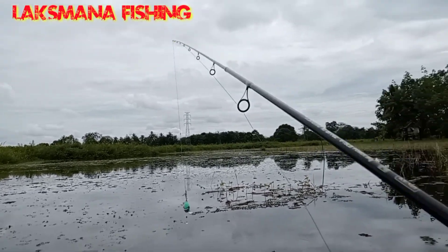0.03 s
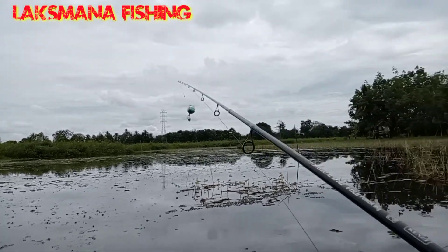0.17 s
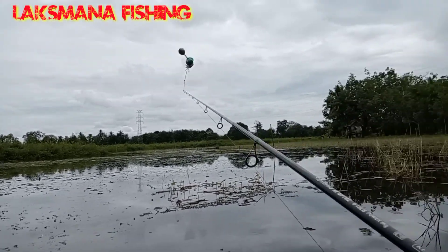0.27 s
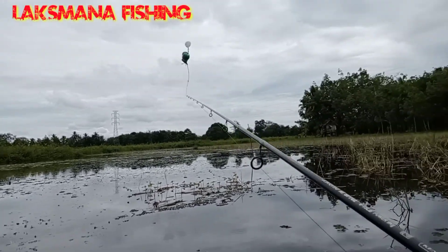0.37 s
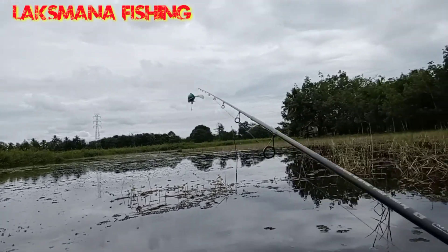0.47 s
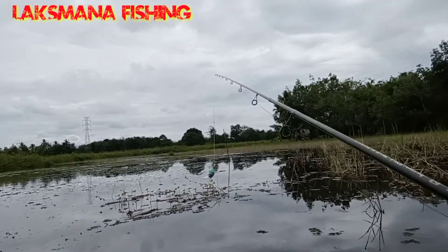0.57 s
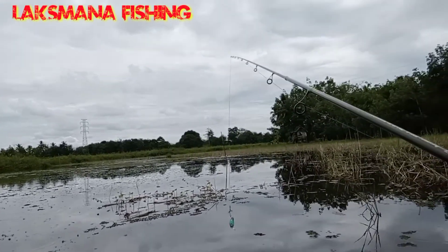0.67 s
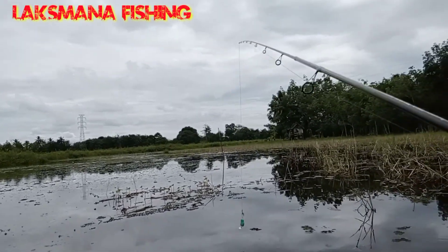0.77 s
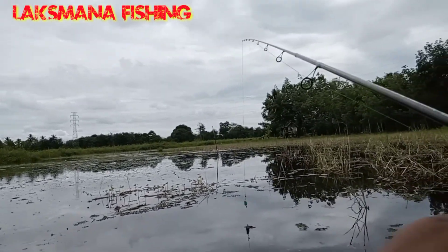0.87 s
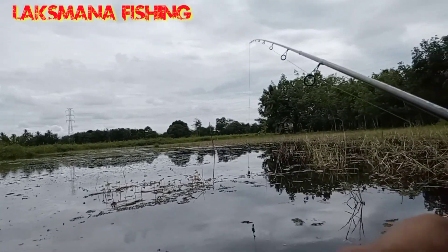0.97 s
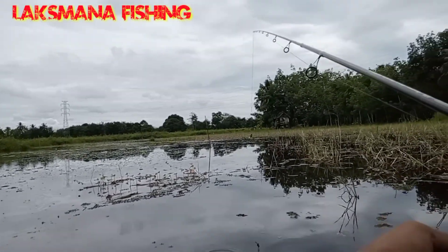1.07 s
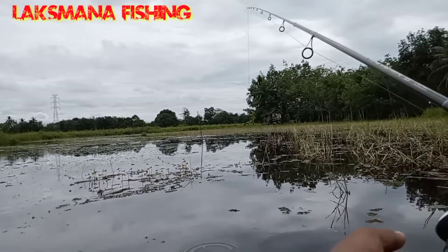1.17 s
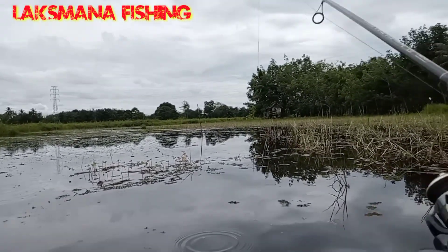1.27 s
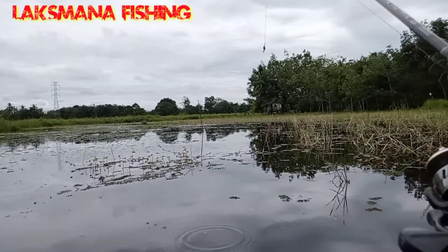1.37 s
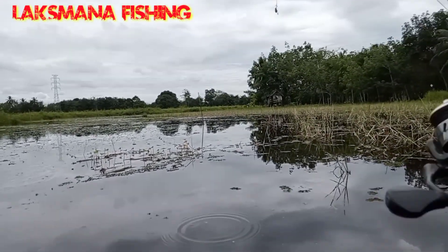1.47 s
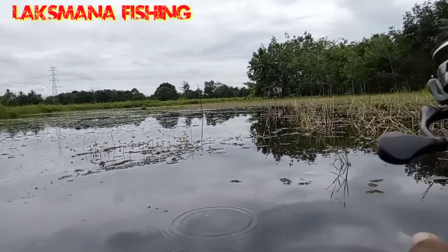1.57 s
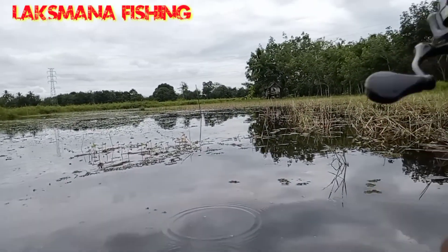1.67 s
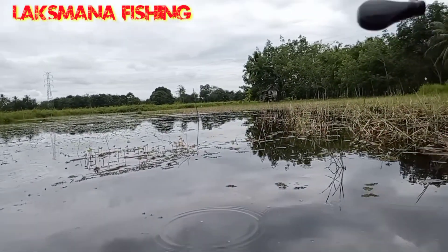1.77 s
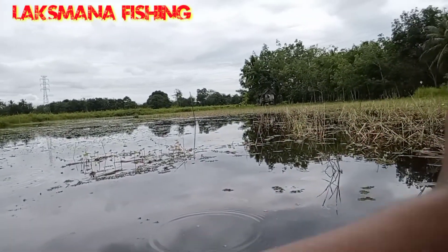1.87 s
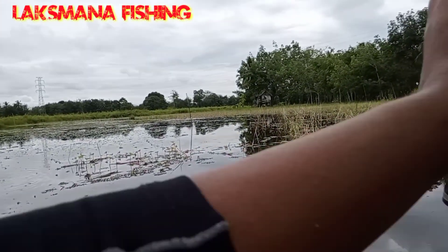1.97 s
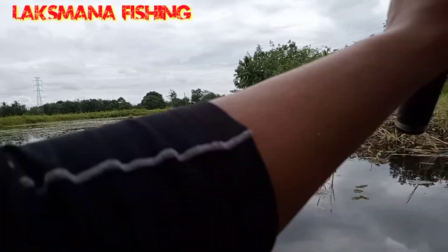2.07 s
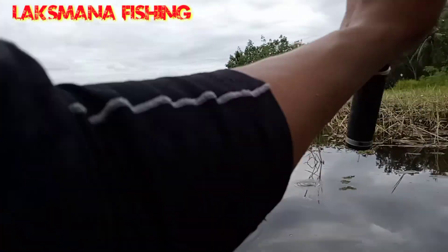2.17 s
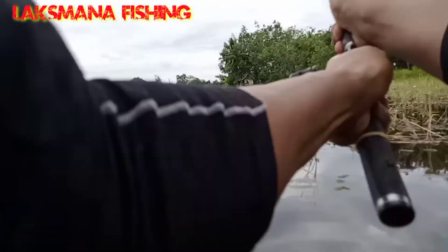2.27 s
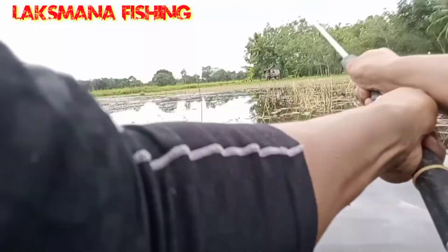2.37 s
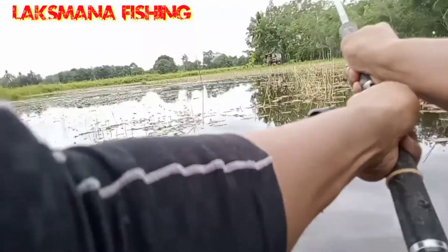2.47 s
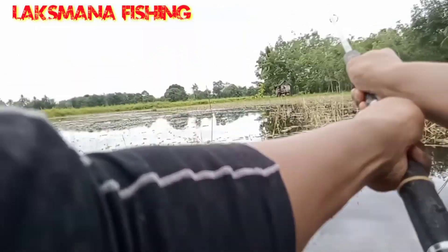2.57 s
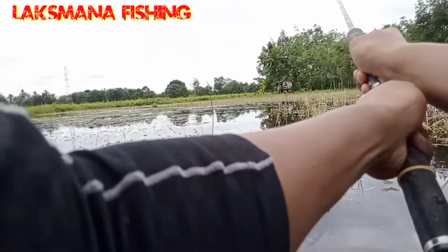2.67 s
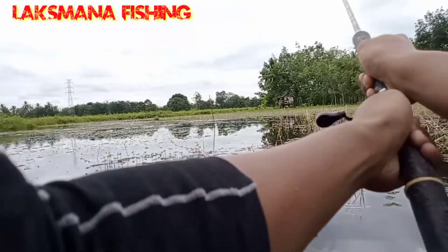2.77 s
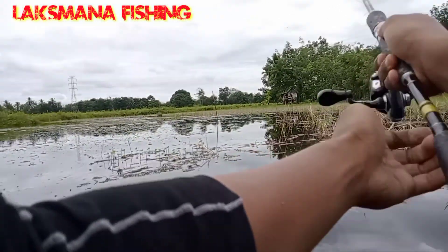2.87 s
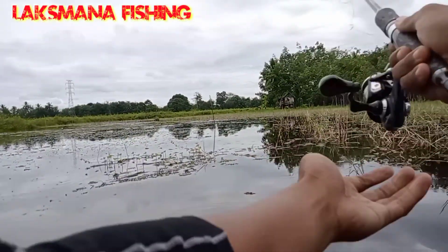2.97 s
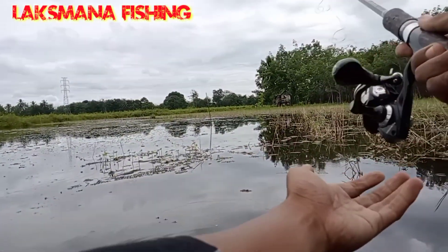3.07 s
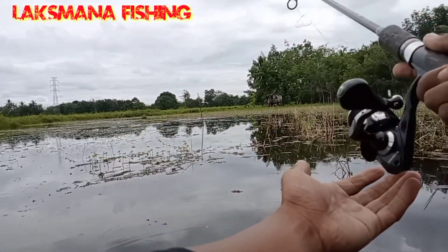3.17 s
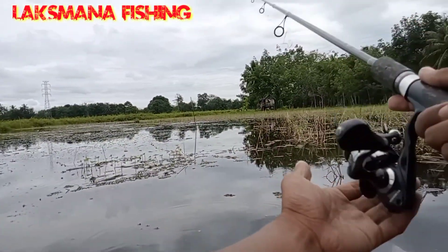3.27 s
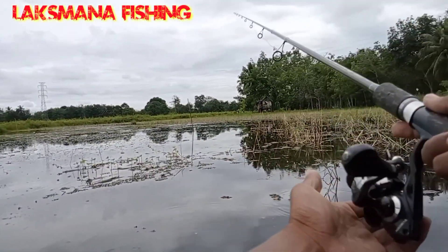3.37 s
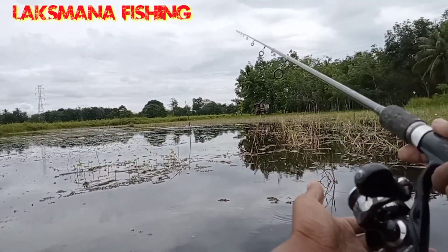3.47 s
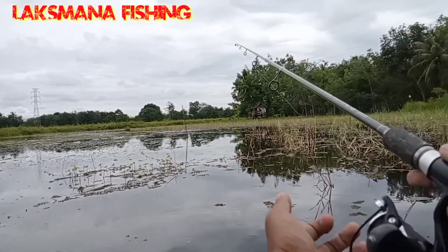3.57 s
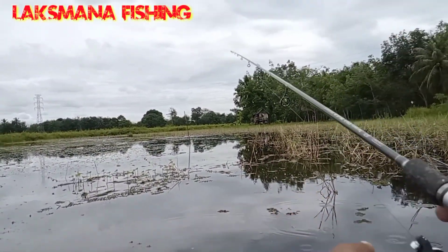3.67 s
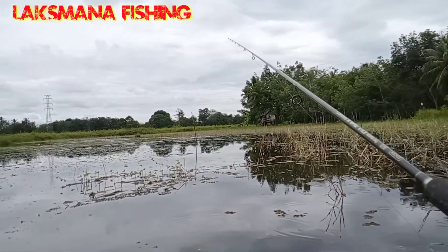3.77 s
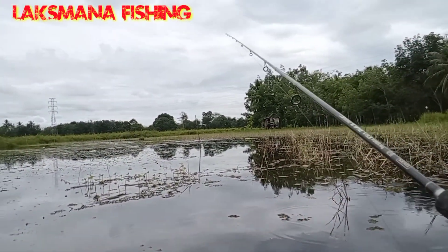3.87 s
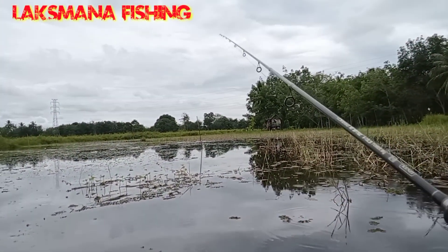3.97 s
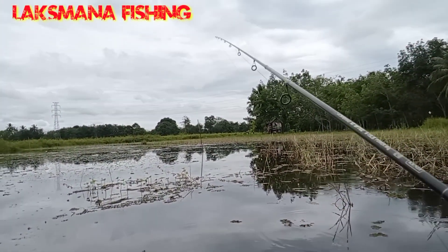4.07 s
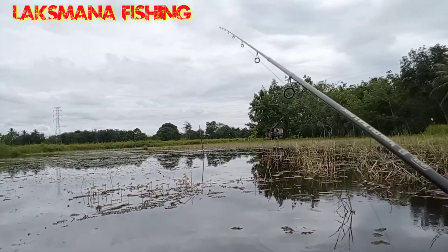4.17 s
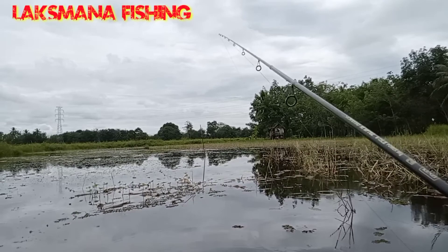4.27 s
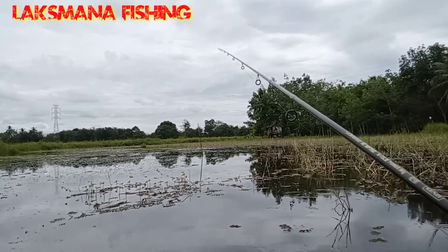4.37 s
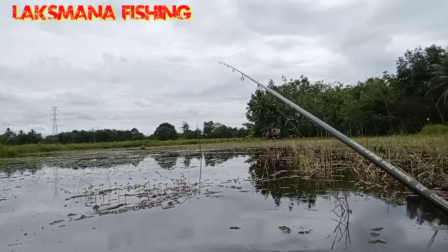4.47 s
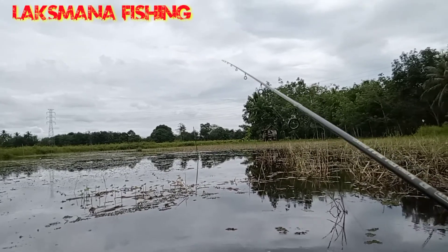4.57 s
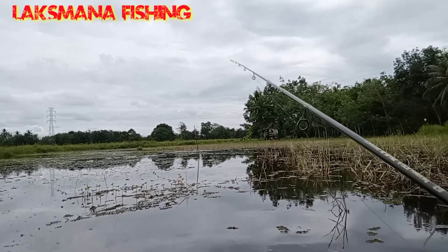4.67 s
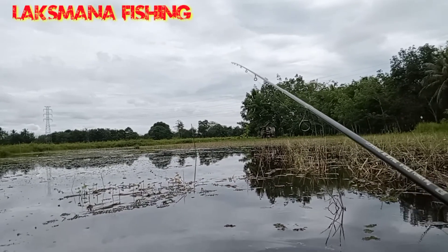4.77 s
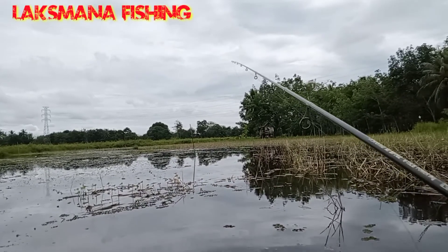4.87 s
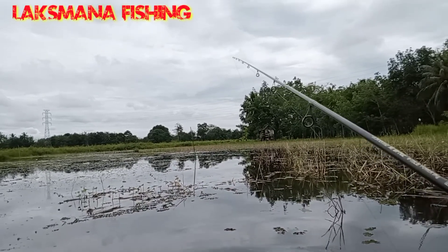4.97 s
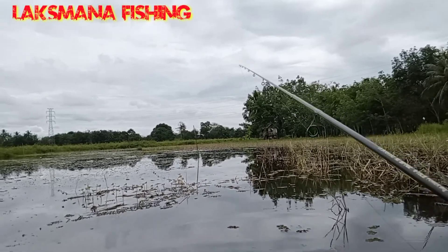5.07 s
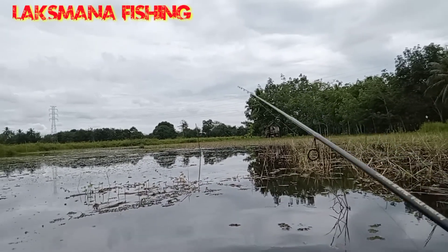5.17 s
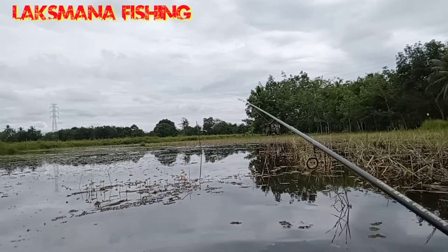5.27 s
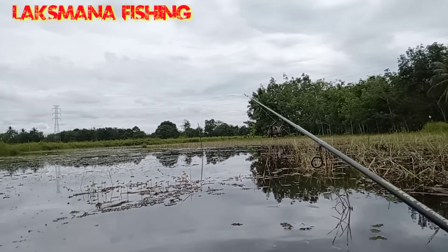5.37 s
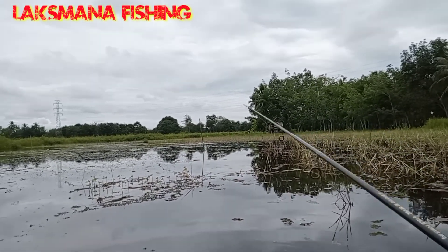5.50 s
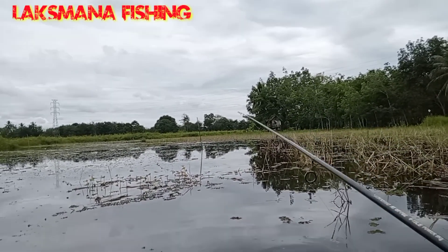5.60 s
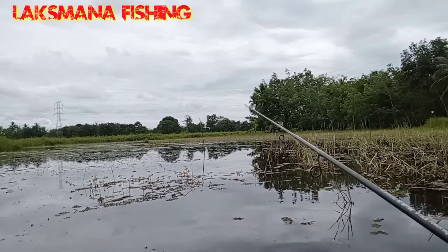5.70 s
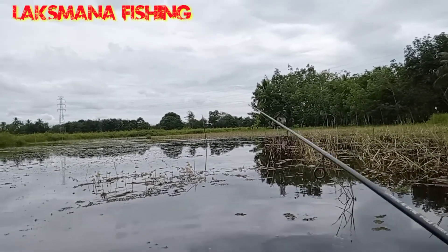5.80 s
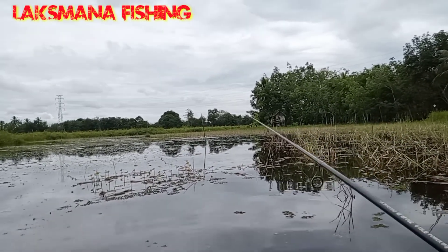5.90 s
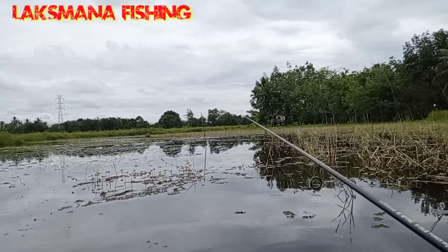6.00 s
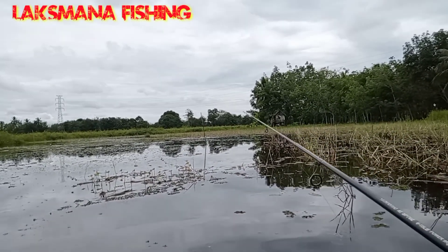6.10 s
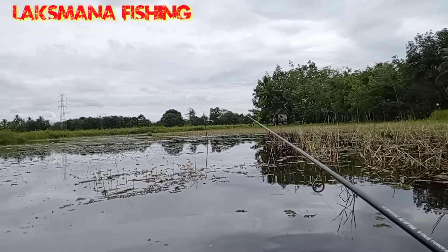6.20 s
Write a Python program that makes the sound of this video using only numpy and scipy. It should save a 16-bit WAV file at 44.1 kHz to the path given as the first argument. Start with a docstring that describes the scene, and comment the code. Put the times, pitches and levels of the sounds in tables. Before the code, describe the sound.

A fishing reel clicks, a rod swishes and line hisses out, then the reel snaps shut and whirrs over faint insects.

```python
"""Insects hiss over a swampy lake while fishing tackle clicks, a sleeve rustles and a small bird chips.
The bail (the reel's wire arm) clicks open, the rod swishes through the air, and line pours off the spool
in a hiss that sinks as the lure slows. The bail snaps shut, the reel shudders, and its gears whine and
whirr as the line is wound in."""
import sys
import numpy as np
from scipy import signal
from scipy.fft import rfft, irfft
from scipy.io import wavfile

SR = 44100
rng = np.random.default_rng(int(sys.argv[2]) if len(sys.argv) > 2 else 0)


def inscribe(sig):
    """Save sig as 16-bit PCM at rate SR to the path in sys.argv[1].

    A 1-D sig is mono; a 2-D sig holds one channel per row.
    Samples are clipped to [-1, 1] before scaling.
    """
    pcm = np.round(np.clip(np.atleast_2d(sig).T, -1, 1) * 32767)
    wavfile.write(sys.argv[1], SR, pcm.astype(np.int16))


N = 275139
T = np.arange(N) / SR

# tone shared by the clicks and whirr, strong middle tones and little above them: pitch_hz, level_db
MID_TONE = [(1300, -8), (2200, -4.5), (4300, -5), (5300, -18.5)]
# the bright edge of a click: pitch_hz, level_db
EDGE_TONE = [(2000, -15.5), (4500, -6.5), (6000, -9), (8000, -6.5), (9700, 2), (12000, -16), (15500, -21)]


def amp(db):
    """Turns decibels into a gain."""
    return 10 ** (np.asarray(db) / 20)


def unit(x):
    """Scales a sound to an average (rms) level of 1."""
    return x / np.sqrt(np.mean(x ** 2) + 1e-20)


def unit_hit(x):
    """Gives a short sound the energy of ten milliseconds at level 1."""
    return x / np.sqrt(np.sum(x ** 2) / (SR * .01))


def add(mix, start_s, sound):
    """Lays a sound into the mix."""
    part = mix[round(start_s * SR):][:len(sound)]
    part += sound[:len(part)]


def colour(x, spectrum, size=4096):
    """Shapes a sound's tone with a filter drawn through rows of pitch_hz, level_db."""
    hz, db = np.transpose(spectrum)
    bins_hz = abs(np.fft.fftfreq(size, 1 / SR))
    log_gain = np.log(amp(np.interp(np.log(bins_hz + 1), np.log(hz + 1), db)))
    taps = np.fft.ifft(np.exp(np.conj(signal.hilbert(log_gain)))).real  # rings only after a hit
    return signal.oaconvolve(x, taps[:size // 2])[:len(x)]


def resonate(x, hz, width_hz):
    """Lets through the sound near one pitch, which may glide."""
    turn = np.exp(2j * np.pi * np.cumsum(hz * np.ones(len(x))) / SR)
    feedback = np.exp(-np.pi * width_hz / SR)
    return 2 * (turn * signal.lfilter([1 - feedback], [1, -feedback], x / turn)).real


def band(x, hz, width_hz):
    """The same resonance twice: a band with steep sides, at level 1."""
    return unit(resonate(resonate(x, hz, width_hz), hz, width_hz))


def wander(rate):
    """A smooth random curve that changes up to about rate times a second."""
    smoothing = np.exp(-(np.fft.rfftfreq(N, 1 / SR) / rate) ** 2)
    return unit(irfft(rfft(rng.standard_normal(N)) * smoothing, N))


def grainy(rate, depth_db):
    """Noise that comes in random clumps."""
    return unit(rng.standard_normal(N) * amp(depth_db * wander(rate)))


def texture(spectrum, rate, depth_db):
    """Clumpy noise with a given tone, at level 1."""
    return unit(colour(grainy(rate, depth_db), spectrum))


def burst(decay_s, size=4096):
    """Two things touch: chatter that dies quickly."""
    return rng.choice([-1., 1.], size) * np.exp(-np.arange(size) / SR / decay_s)


def scattered(x, db, decay_s):
    """Adds close echoes, which ripple the tone."""
    tail = burst(decay_s)
    taps = rng.standard_normal(len(tail)) * tail
    echoes = signal.oaconvolve(x, taps / np.linalg.norm(taps))[:N]
    return (x + amp(db) * echoes) / np.hypot(1, amp(db))


def swell(peak_s, db, rise_s, hold_s, fall_s):
    """A gain that rises to db at peak_s, holds, then dies away."""
    return amp(db) * np.exp(-np.maximum(peak_s - T, 0) / rise_s - np.maximum(T - peak_s - hold_s, 0) / fall_s)


def strokes(rows, rise_s, fall_s):
    """The joint gain of several swells that rise and fall alike."""
    return np.sqrt(sum(swell(s, db, rise_s, hold_s, fall_s) ** 2 for s, db, hold_s in rows))


def lakeside():
    """Low moving air and the shimmering hiss of far insects."""
    # tone of the air and of the insects: pitch_hz, level_db
    air_tone = [(25, -52), (45, -16.5), (80, -3.5), (135, -2), (210, -8), (355, -17), (730, -19),
                (1500, -28), (2500, -60)]
    insect_tone = [(1000, -35), (1500, -12), (2200, -5), (3700, -2.5), (4400, -12.5), (5800, -27),
                   (7100, -13), (7800, -21.5), (8800, -6.5), (9800, 0), (10900, -15.5), (13000, -24),
                   (15500, -21)]
    air = amp(-69.5) * texture(air_tone, rate=2.9, depth_db=0.4)
    chorus = scattered(grainy(rate=26, depth_db=1), db=-6, decay_s=0.0016)
    return air + amp(-69) * unit(colour(chorus, insect_tone))


def bird():
    """A held note flicks downward; the flick bounces off the water, then scatters in the reeds."""
    # the chips: flick_s, level_db
    chips = [(2.043, -61), (2.138, -58.5), (2.236, -55), (2.334, -52.5), (2.444, -51), (2.565, -52)]
    # shape of one chip: time_from_flick_s, pitch_hz, relative_db
    chip_shape = [(-.027, 4100, -18), (-.021, 4280, -6), (-.011, 4400, -3), (-.001, 4200, -7),
                  (.002, 3700, 4), (.006, 2800, 4), (.009, 2400, -20)]
    times, hz, shape_db = np.transpose(chip_shape)
    t = np.arange(times[0], times[-1], 1 / SR)
    song = np.zeros(N)
    for flick_s, db in chips:
        pitch = np.interp(t, times, hz) * (1 + 0.0065 * rng.standard_normal())
        gain = amp(db + np.interp(t, times, shape_db))
        add(song, flick_s + times[0], gain * np.sin(2 * np.pi * np.cumsum(pitch) / SR))
    flick = colour(song, [(3600, 0.5), (4200, -6.5)])
    echo = np.roll(scattered(flick, db=7, decay_s=0.011), round(0.0076 * SR))
    return song + amp(3.5) * echo


def hands():
    """A sleeve rustles as the arm moves, and line rubs on the fingers and the rod's rings."""
    # tone of the cloth and of the rubbing line: pitch_hz, level_db
    cloth_tone = [(30, -16), (80, -2), (300, 0.5), (800, -8), (1300, -19), (3000, -21), (6000, -60)]
    rub_tone = [(880, -66), (1500, -13), (2040, -13), (2770, -5), (3810, -9), (7460, -28), (9650, -9),
                (16000, -45)]
    # arm movements and slides of the line: peak_s, level_db, hold_s
    rustles = [(0, -66, .03), (.74, -63.5, .02), (1.17, -66.5, 0.058), (2.25, -66, 0.76), (3.2, -73.5, 3.4)]
    slides = [(.12, -70, .22), (.69, -64.5, 0.051), (.85, -62, 0.059), (1.16, -60.5, 0.042),
              (2.25, -65.5, 0.074), (3.865, -59, 0.034)]
    arm = np.hypot(amp(-73), strokes(rustles, rise_s=0.1, fall_s=0.18))  # never quite still
    sleeve = arm * texture(cloth_tone, rate=23, depth_db=1.5)
    line = strokes(slides, rise_s=0.051, fall_s=0.039) * texture(rub_tone, rate=270, depth_db=3)
    return sleeve + line


def tackle():
    """Each click has a short ring, a knock through the rod and a bright edge; some parts ring on."""
    # clicks of reel and tackle: start_s, level_db, ring_hz, knock_relative_db, edge_relative_db
    clicks = [(0.0995, -61, 2070, 12.5, -32), (0.1032, -61, 1960, 15, -30), (0.1192, -57.5, 3030, -25, -14),
              (0.633, -62.5, 2780, -9, -7), (.656, -57.5, 3400, -11, -1), (0.7102, -57, 4300, -20, -10),
              (1.056, -61, 2680, -17, -13), (1.1456, -47, 2980, -4, -3), (1.1489, -42, 2420, -9.5, -0.5),
              (1.163, -55, 3830, -10, -1), (2.2173, -63.5, 3400, 4, -12), (2.345, -52, 3400, 1, -3),
              (2.442, -44, 3760, -25, -11), (2.894, -52.5, 3160, -30, -18), (2.931, -56, 3170, -18, -13),
              (3.27, -65, 980, 2.5, -23), (3.6447, -52, 3700, -13, 5), (3.6482, -37.5, 4170, -26, -11),
              (3.6532, -40, 4000, -22, -6), (3.8459, -46.5, 2540, -13.5, -35),
              (3.9308, -39.5, 3240, -10.5, -3), (3.9379, -41.5, 2970, -6, -12),
              (4.648, -58, 3280, -0.5, -21), (4.694, -48.5, 2950, -10.5, -27), (5.188, -67, 3000, -15, 3),
              (5.341, -60.5, 3370, -9, -11), (5.471, -56, 2790, -5, -32), (5.74, -57.5, 1850, -1.5, -11),
              (5.966, -54.5, 3100, -11, -3.5), (5.989, -56.5, 3220, -22, -4), (6.022, -53, 3150, -2.5, -29),
              (6.103, -54.5, 2950, -2, -16)]
    # tone of the knock: pitch_hz, level_db
    knock_tone = [(60, -45), (200, -3.5), (450, 0.5), (650, -4.5), (800, -3), (1050, -4.5), (1350, -24),
                  (5000, -34)]
    # parts that ring on, the bail wire highest: start_s, pitch_hz, level_db, ring_s (to fall 60 dB)
    pings = [(.099, 1940, -49, 0.079), (0.103, 1104, -64.5, 0.47), (.6562, 14700, -34, 0.0079),
             (0.655, 9780, -42, .04), (1.158, 9700, -29.5, 0.042), (1.163, 4380, -41, 0.032),
             (4.133, 4890, -41, 0.017)]
    ticks = 1.0 * (rng.random(N) < 9 / SR)  # loose tackle, about 9 faint ticks a second
    ticks = band(scattered(ticks, db=12, decay_s=0.0047), hz=3100, width_hz=1500)
    out = amp(-82.5) * unit(colour(ticks, MID_TONE))
    for start_s, db, hz, knock_db, edge_db in clicks:
        ring = unit_hit(colour(band(burst(decay_s=0.002), hz, 0.51 * hz), MID_TONE))
        knock = unit_hit(colour(burst(decay_s=0.013), knock_tone))
        edge = unit_hit(colour(burst(decay_s=0.002), EDGE_TONE))
        add(out, start_s, amp(db) * (ring + amp(knock_db) * knock + amp(edge_db) * edge))
    t = T[:SR // 2]
    onset = 1 - np.exp(-t / 0.0009)
    for start_s, hz, db, ring_s in pings:
        add(out, start_s, amp(db - 60 * t / ring_s) * onset * np.sin(2 * np.pi * hz * t))
    return out


def swish():
    """Air swirls behind the rod: each sweep is a whoosh and a wavering note that sinks as the rod slows."""
    # air torn by the rod: pitch_hz, level_db
    whoosh_tone = [(24, -54), (40, -25), (70, -4.5), (232, -15), (310, -2), (420, -4.5), (560, -2.5),
                   (1060, -9.5), (1500, -49), (1950, -55), (3300, -120)]
    # stroke and follow-through: peak_s, whoosh_db, fall_s, note_db, pitch_hz, sag_octaves_per_s
    sweeps = [(2.378, -42, 0.045, -52, 370.6, 7), (2.52, -53.5, 0.15, -45.5, 271, 3.4)]
    out = np.zeros(N)
    for peak_s, whoosh_db, fall_s, note_db, hz, sag in sweeps:
        whoosh = texture(whoosh_tone, rate=62, depth_db=1.5)
        pitch = hz * 2 ** (-sag * np.clip(T - peak_s, -.5, .5)) * (1 + 0.036 * wander(rate=94))
        note = unit(np.sin(2 * np.pi * np.cumsum(pitch) / SR) * amp(2.3 * wander(rate=62)))
        out += swell(peak_s, whoosh_db, rise_s=0.023, hold_s=0.05, fall_s=fall_s) * whoosh
        out += swell(peak_s, note_db, rise_s=0.044, hold_s=0.033, fall_s=0.071) * note
    return out


def flying_line():
    """Coils slap the rings and hiss over the spool lip; as they slow, the hiss narrows and sinks."""
    # tone of line on the spool lip and of coils on the rings: pitch_hz, level_db
    hiss_tone = [(2350, -61), (4000, -32), (6440, -8.5), (7570, 1), (9720, 11.5), (12800, 2), (14900, 2.5),
                 (16000, -5)]
    slap_tone = [(650, -39), (1100, -18), (1410, -6), (1900, -3), (2250, -3), (3080, -3), (4240, -10.5),
                 (6000, -17), (7800, -37), (13200, -120)]
    release_s, sing_s, slowing_s, octaves_per_s = 2.385, 2.613, 0.86, 2.68
    rush = swell(release_s, db=-46, rise_s=0.038, hold_s=0.14, fall_s=0.14)
    rush *= texture(hiss_tone, rate=59, depth_db=2.3)
    slap = swell(release_s, db=-42, rise_s=0.038, hold_s=0, fall_s=0.17)
    slap *= texture(slap_tone, rate=430, depth_db=3)
    speed = 2 ** (-octaves_per_s * np.clip(T - sing_s, 0, slowing_s))
    centre_hz = 14200 * speed * (1 + 0.047 * wander(rate=330))  # coils leave the spool unevenly
    spread = np.interp(T, [2.9, 3.2], [1, 0])  # fast coils are less orderly
    wide = resonate(band(grainy(rate=230, depth_db=-1.5), centre_hz, 5300), centre_hz, 5500)
    narrow = band(grainy(rate=300, depth_db=4), centre_hz, 1280)
    # fast coils sing briefly; the last slow ones only whisper
    coils = strokes([(sing_s, -51.5, 0.089), (sing_s, -71.5, slowing_s)], rise_s=0.07, fall_s=0.19)
    sing = coils * (np.sqrt(spread) * unit(wide) + np.sqrt(1 - spread) * narrow)
    wire = amp(16.5) * resonate(sing, hz=9360, width_hz=370)  # the bail rings as the hiss passes its pitch
    return scattered(rush + slap + sing + wire, db=-4.5, decay_s=0.0053)


def bail_snap():
    """The sprung bail hits its stop, rings rod and reel, and leaves the reel's spinning head rattling."""
    # the hit and its bounces: start_s, level_db, decay_s
    slams = [(3.6616, -24, 0.00067), (3.6632, -21, 0.0031), (3.673, -36, 0.00092), (3.6755, -42, 0.008)]
    # notes of rod and reel: pitch_hz, relative_db, ring_s (to fall 60 dB)
    notes = [(88, -6, 0.4), (123, -7.5, 0.35), (382, -3, 0.1), (778, 0.5, 0.19), (890, -8, 0.11),
             (2130, 9, 0.045), (2230, -26, 0.04), (2600, 13, 0.074), (3200, 11, 0.033), (3760, 9, 0.078),
             (4050, -5, .06), (4280, 9, 0.079)]
    # the head rattles, rebounds and settles: peak_s, level_db, rise_s, fall_s
    rattles = [(3.666, -32, 0.0029, 0.015), (3.701, -35, 0.0081, 0.0064), (3.72, -57, .008, 0.04)]
    # tone of the hit and of the rattle: pitch_hz, level_db
    slam_tone = [(120, -52.5), (200, -34), (836, 0.5), (1230, -22), (2050, 0.5), (2610, 1.5), (4120, 2),
                 (5840, -13.5), (7270, -3.5), (7970, -9.5), (10100, 5), (12600, -15), (14100, -7),
                 (16000, -43)]
    rattle_tone = [(29, -33), (50, -7), (321, -12), (408, -2), (495, -14), (765, -0.5), (1300, -15.5),
                   (2620, -6.5), (4790, -26.5), (9410, -33), (16000, -48)]
    out = np.zeros(N)
    for start_s, db, decay_s in slams:
        add(out, start_s, amp(db) * unit_hit(colour(burst(decay_s), slam_tone)))
    t = T[:SR // 2]
    ring = sum(amp(db - 60 * t / ring_s) * np.sin(2 * np.pi * (hz * t + rng.random()))
               for hz, db, ring_s in notes)
    add(out, slams[0][0], amp(-39.5) * ring * (1 - np.exp(-t / 0.0027)))
    chatter = grainy(rate=890, depth_db=1)
    shudder = sum(swell(peak_s, db, rise_s, 0, fall_s) for peak_s, db, rise_s, fall_s in rattles)
    return out + colour(shudder * chatter, rattle_tone) / np.std(colour(chatter, rattle_tone))


def gear_whine():
    """Gear teeth meet at a pitch that follows the speed of the crank."""
    # how fast the teeth meet: time_s, pitch_hz
    crank = [(4.15, 1666), (4.42, 1763), (4.68, 1710), (4.9, 1793), (5.08, 1724), (5.22, 2072),
             (5.46, 2007), (5.53, 2135), (5.565, 2404), (5.63, 2404), (5.79, 2085), (5.85, 1805)]
    # the teeth catch on some turns: peak_s, level_db, hold_s
    catches = [(4.14, -68.5, .14), (4.4, -70, 0.033), (4.69, -67, 0.294), (5.11, -67.5, .03),
               (5.22, -72, 0.17)]
    teeth_hz = np.interp(T, *np.transpose(crank))
    spurt_db = -53 + 22 * np.log2(teeth_hz / teeth_hz.max())  # one fast turn sings out, louder with speed
    spurt = swell(5.475, spurt_db, rise_s=0.013, hold_s=0.18, fall_s=0.21)
    load = np.hypot(strokes(catches, rise_s=0.034, fall_s=0.058), spurt)
    slack = (1 - load / load.max()) ** 2  # a slack crank turns unsteadily
    pitch = teeth_hz * (1 + 0.0054 * wander(rate=84) + .018 * slack * wander(rate=13))
    tone = unit(np.sin(2 * np.pi * np.cumsum(pitch) / SR) * amp(1.6 * wander(rate=82)))
    rough = band(rng.standard_normal(N), pitch, width_hz=110)
    firm = np.clip(1.16 * (load / load.max()) ** .5, 0, 1)  # lightly loaded teeth meet unevenly
    return load * (firm * tone + np.sqrt(1 - firm ** 2) * rough)


def reel_whirr():
    """Rubbing gears whirr in their housing while line ticks onto the spool."""
    # resonances of the housing: pitch_hz, width_hz, relative_db
    resonances = [(1815, 110, -22), (2110, 120, -10.5), (2800, 220, -1), (3290, 470, 2.5),
                  (4250, 94, -12.5)]
    # tone of the turning reel: pitch_hz, level_db
    whirr_tone = [(59, -33), (100, 2), (166, -12.5), (249, 1.5), (502, -2), (1330, -10), (1760, -3.5),
                  (1950, -8.5), (3250, 1), (4770, -24), (9820, -13.5), (16000, -47)]
    # the hand presses harder on the crank: peak_s, level_db, hold_s
    surges = [(4.6, -62.5, 0.13), (5.5, -66, 0.65)]
    rubbing = grainy(rate=330, depth_db=2.5)
    ringing = sum(amp(db) * band(rubbing, hz, 1.5 * width_hz) for hz, width_hz, db in resonances)
    housing = unit(colour(ringing, MID_TONE))
    whirr = texture(whirr_tone, rate=74, depth_db=2.5)
    slips = rng.standard_normal(N) * (rng.random(N) < 14 / SR)  # about 14 a second
    ticks = unit(colour(slips, EDGE_TONE))
    body = scattered(amp(-3) * housing + amp(-0.5) * whirr, db=-10, decay_s=0.016)
    turning = np.exp(-np.maximum(3.97 - T, 0) / 0.084)  # winding is under way by 3.97 s
    effort = np.hypot(amp(-63.5) * turning, strokes(surges, rise_s=0.19, fall_s=0.1))
    unsteady = amp(1.24 * wander(rate=11))  # no two turns are alike
    return effort * (unsteady * body + amp(-18.5) * ticks)


def scene():
    """Everything is out in the open, so there is no room echo."""
    background = lakeside() + bird() + hands() + tackle()
    return (background + swish() + flying_line() + bail_snap() + gear_whine() + reel_whirr())[None]


def record(dry):
    """Cuts the highest treble, above 15700 Hz."""
    low_pass = signal.firwin(511, 15700, window=("kaiser", 9), fs=SR)
    return signal.oaconvolve(dry, low_pass[None], "same")


dry = scene()
out = record(dry)
inscribe(out)
```